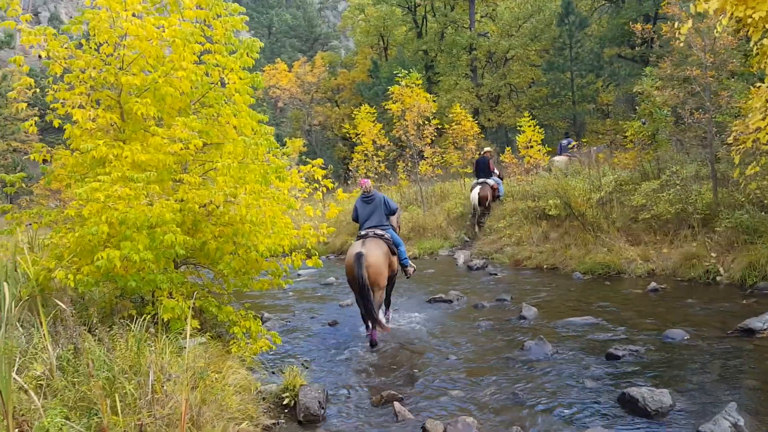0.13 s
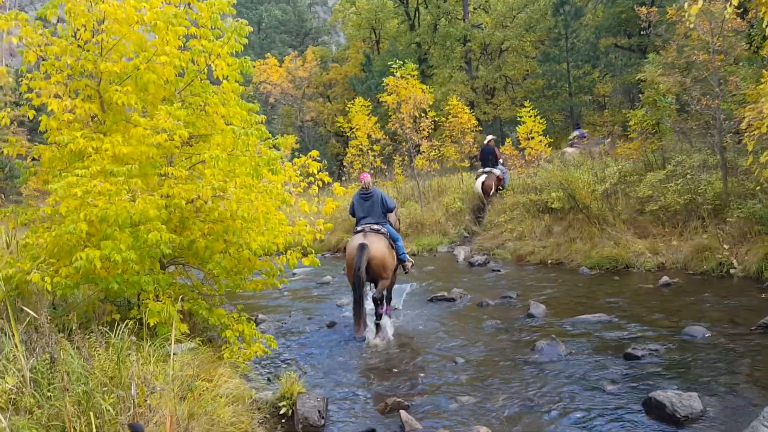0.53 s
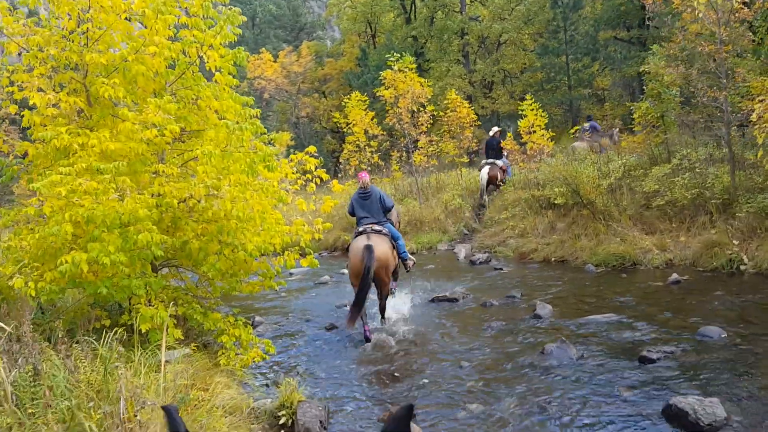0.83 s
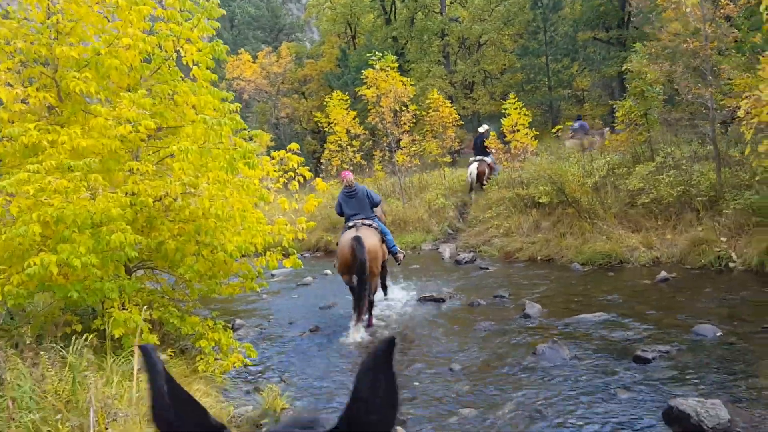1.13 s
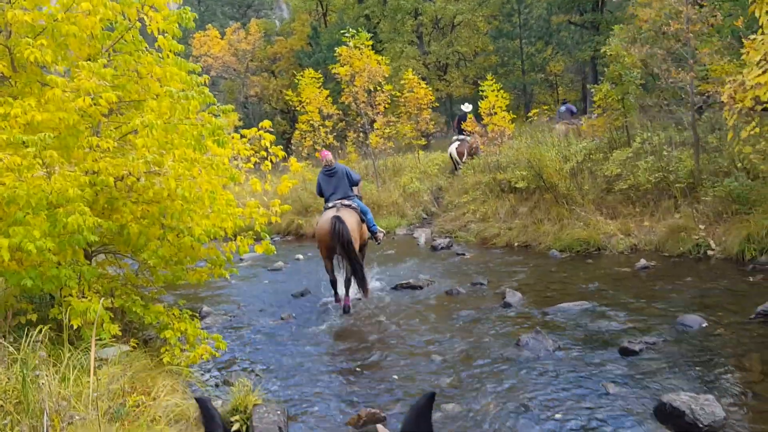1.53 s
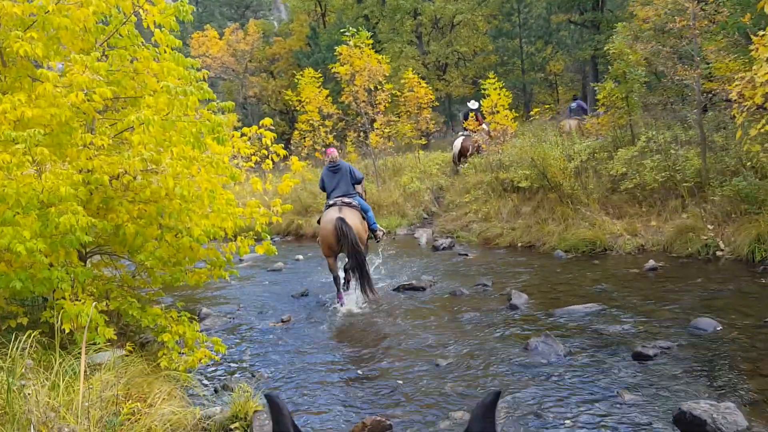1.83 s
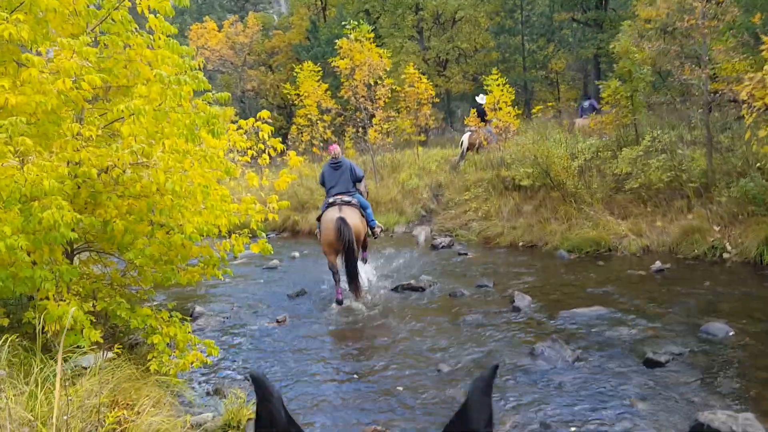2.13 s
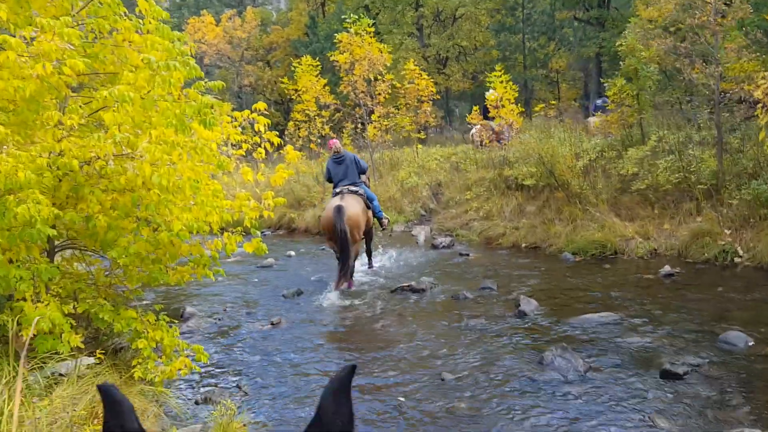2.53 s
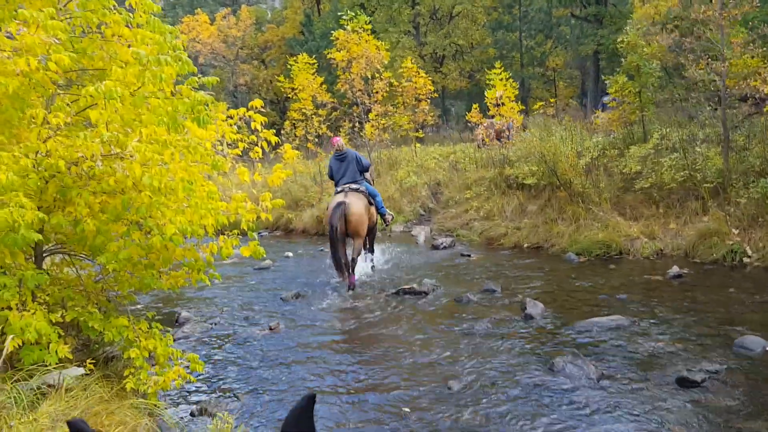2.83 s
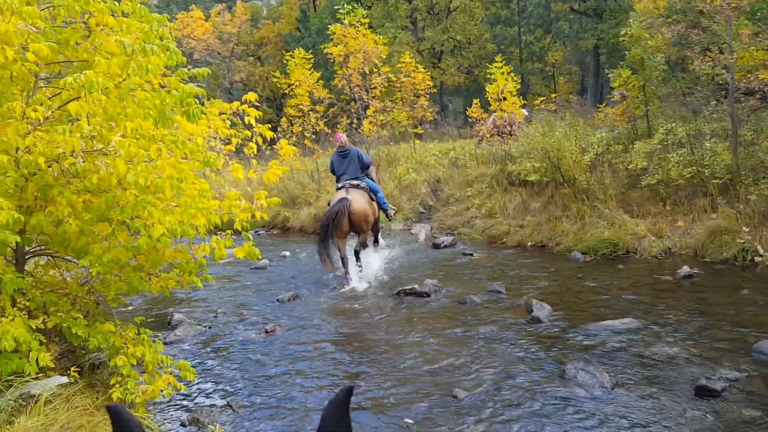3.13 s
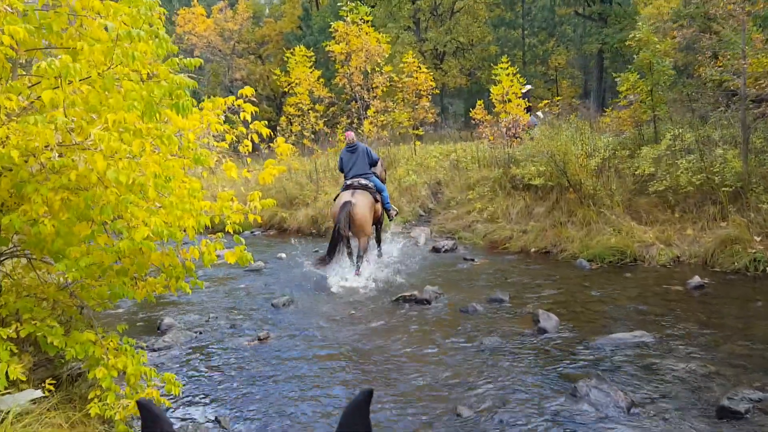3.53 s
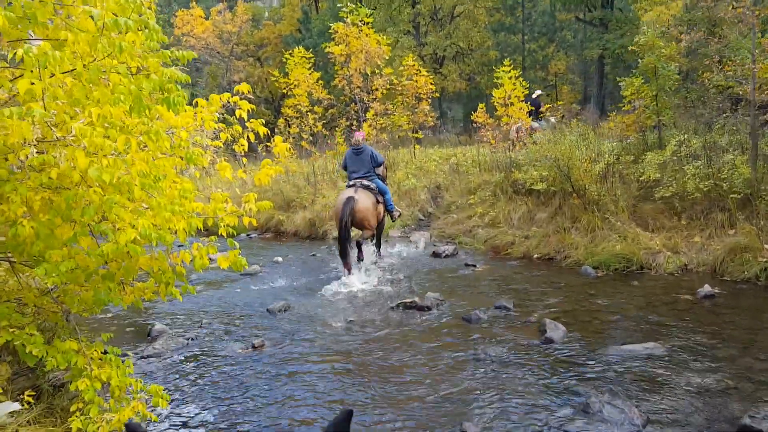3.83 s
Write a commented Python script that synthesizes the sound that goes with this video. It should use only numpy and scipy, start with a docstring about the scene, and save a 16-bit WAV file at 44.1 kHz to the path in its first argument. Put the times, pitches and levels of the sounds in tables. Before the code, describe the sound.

Horse legs splash irregularly through shallow water, with hollow plops and stony knocks over gurgling flow.

```python
"""A creek full of small bubbles washes along, then horses wade through it, heard from the saddle.
Legs dragged through the water swish and throw up spray: patchy noise mixed with tiny bubble rings.
Hooves slap (bursts of noise), knock on the stony bed (low tones that sink in pitch) and make
trapped air and loose stones plop (short ringing tones). The hits scatter briefly off stones and water."""
import sys
import numpy as np
from scipy import signal
from scipy.fft import rfft, irfft, next_fast_len
from scipy.io import wavfile
from scipy.ndimage import uniform_filter1d, map_coordinates

SR = 44100
rng = np.random.default_rng(int(sys.argv[2]) if len(sys.argv) > 2 else 0)


def int16_out(signal):
    """Quantize to a 16-bit WAV file."""
    q = np.round(np.clip(np.atleast_2d(signal).T, -1, 1) * 32767)
    wavfile.write(sys.argv[1], SR, q.astype(np.int16))


N = 176400  # samples: 4 s

# Legs dragged through the water: start_s, length_s, churn_db, spray_db
SWISH_STROKES = [(0.105, 0.035, -45, -38), (0.147, 0.08, -40.5, -53), (0.295, .06, -48.5, -73),
                 (0.433, 0.053, -44, -56), (0.525, 0.019, -39.5, -72), (0.58, 0.0077, -47, -45),
                 (0.755, 0.1, -38.5, -42), (0.849, 0.12, -38.5, -47), (1.07, 0.18, -42, -41),
                 (1.392, 0.046, -41.5, -43), (1.459, 0.15, -39.5, -77), (1.728, 0.099, -38, -44),
                 (1.853, 0.12, -45.5, -56.5), (2.061, 0.09, -38, -40), (2.168, 0.016, -36.5, -56),
                 (2.375, 0.14, -43, -43.5), (2.658, 0.065, -36.5, -43), (2.76, 0.12, -37.5, -60),
                 (2.971, 0.058, -45, -43), (3.034, 0.06, -37.5, -52), (3.125, 0.045, -37, -45),
                 (3.227, 0.099, -35, -39.5), (3.38, .04, -37, -43), (3.423, 0.12, -40.5, -46.5),
                 (3.647, 0.11, -41, -41.5), (3.765, 0.061, -45, -61), (3.867, 0.056, -47, -70),
                 (3.928, 0.1, -63, -42)]
# Tone colour of the stirred water: frequency_hz, level_db (per Hz)
CHURN_COLOUR = [(35, -55), (60, -23.5), (209, -3.5), (372, -8), (633, 1), (800, -6.5), (1110, -4),
                (1490, -8.5), (1800, -17), (2010, -9.5), (2500, -19), (3250, -48), (5500, -120)]
# Tone colour of the thrown spray: frequency_hz, level_db (per Hz)
SPRAY_COLOUR = [(1000, 12.5), (1700, 3.5), (2380, -6.5), (3240, -1.5), (4360, -5), (5060, -11.5),
                (6160, -9), (10200, -17), (12400, -10.5), (15800, -25)]
ATTACK_S, RELEASE_S = 0.0073, 0.022  # straight rise; time for the fall to shrink to 37 %
CHURN_FLUTTER_DB, SPRAY_FLUTTER_DB = 2.0, 2.4

# Air pockets and loose stones under the hooves: start_s, level_db, pitch_hz, t60_ms (time to fall 60 dB)
AIR_POCKETS = [(0.177, -27.5, 605, 12), (0.1985, -26, 1800, 10), (0.2, -27, 1080, 23),
               (0.1937, -15, 555, 9.4), (0.2058, -20, 480, 17), (0.299, -31.5, 440, 19),
               (0.438, -27, 1160, 12), (0.473, -26, 580, 10), (0.485, -25, 1033, 8),
               (0.5394, -23.5, 415, 10), (0.5415, -30, 1561, 15), (0.5822, -26, 960, 17),
               (0.589, -29, 990, 20), (0.8467, -16, 474, 51), (0.847, -21.5, 1110, 16),
               (0.8687, -13, 445, 10.6), (0.871, -29, 1590, 21), (0.904, -22.5, 274, 26),
               (0.9053, -12, 493, 8.7), (0.908, -22.5, 1120, 11), (0.914, -24, 524, 45),
               (1.122, -27, 694, 9.1), (1.1484, -28.5, 940, 17), (1.172, -31, 650, 7.6),
               (1.181, -27.5, 600, 9), (1.2248, -11.5, 488, 9.9), (1.2255, -24, 1100, 14),
               (1.3985, -30, 1530, 49), (1.4183, -28, 979, 10), (1.4194, -28, 1470, 9.9),
               (1.4549, -10, 476, 8.1), (1.4541, -9, 1137, 28), (1.4763, -20, 584, 46),
               (1.4768, -25, 990, 13), (1.5, -20, 570, 5.9), (1.7836, -28, 443, 40), (1.7943, -25, 478, 15),
               (1.878, -31, 350, 31), (1.883, -24, 370, 10), (1.9537, -21, 494, 21),
               (2.0751, -33, 667, 7.4), (2.0761, -21.5, 1140, 10), (2.1158, -24.5, 1510, 11),
               (2.1493, -23.5, 1180, 21), (2.1818, -17, 581, 12), (2.1982, -28, 207, 57),
               (2.2016, -25.5, 616, 17), (2.316, -33, 473, 25), (2.384, -28, 1140, 14),
               (2.4248, -30, 950, 12), (2.4559, -15.5, 540, 11), (2.4665, -23.5, 360, 14),
               (2.6903, -28, 1055, 30), (2.7634, -12, 514, 11), (2.7631, -19.5, 1450, 16),
               (2.7757, -12, 453, 15), (2.7804, -17, 1141, 9), (2.7897, -24, 420, 24),
               (2.814, -23, 1130, 11), (2.8146, -35, 273, 64), (2.8217, -31, 1010, 13),
               (2.885, -28, 1000, 14), (2.982, -22.5, 585, 13), (2.9881, -19.5, 230, 9.3),
               (2.9894, -28, 1060, 25), (2.9897, -19.5, 530, 12), (3.0683, -26.5, 320, 18),
               (3.136, -21.5, 360, 9.2), (3.153, -17, 600, 6.2), (3.1528, -21.5, 238, 20),
               (3.227, -2, 540, 8.9), (3.2288, -12.5, 1050, 19.6), (3.2468, -24.5, 510, 54),
               (3.2764, -17, 616, 15), (3.2799, -19, 1020, 14), (3.2899, -23.5, 1033, 33),
               (3.2905, -11, 570, 15), (3.3023, -14.5, 418, 42), (3.3377, -26, 478, 17),
               (3.3447, -24.5, 605, 18), (3.344, -27.5, 177, 18), (3.3866, -27.5, 717, 31),
               (3.3908, -14.5, 1910, 6.8), (3.3977, -26, 340, 14), (3.4045, -24, 1470, 10),
               (3.4102, -32, 960, 9.2), (3.4467, -30, 217, 44), (3.4565, -19, 1120, 12),
               (3.4566, -23, 2830, 6), (3.4835, -15, 492, 7.5), (3.4915, -25, 209, 38),
               (3.5065, -26, 573, 13), (3.5308, -31, 1447, 36), (3.5352, -26, 211, 10),
               (3.5394, -26.5, 1040, 26), (3.6524, -10.5, 430, 9.4), (3.6543, -10, 1080, 6),
               (3.665, -25, 1007, 39), (3.6654, -15.5, 370, 15), (3.688, -10, 494, 6),
               (3.7102, -20.5, 221, 21), (3.7374, -27, 506, 14), (3.7774, -24, 545, 40),
               (3.7828, -29, 242, 29), (3.8826, -22, 290, 11), (3.8966, -23, 567, 20),
               (3.9541, -26, 310, 14), (3.9844, -23, 380, 52), (3.9955, -26, 1496, 12)]
RISE_CYCLES, PLOP_ROUGH, ROUNDING = 1, 0.1, 1.25  # rise in cycles, raggedness share, decay exponent

# Hooves and thrown water slapping down: start_s, level_db, treble_share_db, t60_ms
WATER_SLAPS = [(0.193, -20.5, -34, 12), (0.582, -27, -2.5, 15), (0.587, -24.5, -9, 16.5),
               (0.692, -34.5, -4, 22), (0.802, -23, -15, 12), (0.8463, -24, -26, 9.7),
               (0.8692, -26, -22, 14), (1.159, -39, 1, 14), (1.4543, -18.5, -26, 18.7),
               (1.5442, -29.5, -14, 18), (1.805, -31.5, -30, 30), (2.0763, -15.5, -32, 12.2),
               (2.7634, -25, -19.5, 11), (2.781, -26, -28, 17), (3.009, -26, -28, 16),
               (3.2277, -5.5, -20.5, 13.3), (3.391, -20, -6, 9.1), (3.3963, -15.5, -10, 9.4),
               (3.4555, -21, -18, 16), (3.4764, -23, -1, 9), (3.558, -36, 2, 14), (3.652, -11, -23, 9.5),
               (3.6673, -22, -19, 14), (3.8216, -33, 1, 14), (3.97, -27, -16, 12)]
# Tone colour of a slap's hard body: frequency_hz, level_db
SLAP_BODY_COLOUR = [(700, -26), (1500, 11), (2600, 4.5), (4300, -7), (5200, -22), (9000, -70)]
# Tone colour of a slap's wet treble: frequency_hz, level_db
SLAP_TREBLE_COLOUR = [(3000, -24), (5000, 7), (12000, -2), (16000, -12)]
SLAP_RISE_S = 0.00098

# Hooves landing on the stony bed: start_s, level_db, starting_pitch_hz
HOOF_THUDS = [(0.585, -36, 175), (0.847, -24.5, 204), (1.0907, -20.5, 236), (1.453, -23, 162),
              (1.545, -30.5, 131), (1.645, -37, 200), (1.817, -34, 260), (1.949, -44, 156),
              (2.189, -30, 200), (2.456, -22.5, 189), (2.777, -29, 181), (2.984, -43, 195),
              (3.087, -35, 159), (3.148, -24, 198), (3.224, -22, 172), (3.291, -29, 131),
              (3.476, -27.5, 200), (3.534, -41, 182), (3.652, -19.5, 198), (3.687, -21, 202)]
THUD_T60_S, THUD_RISE_S = 0.075, 0.0014
THUD_SAG, SAG_S = 0.48, 0.014  # share of pitch finally lost; time constant of the sinking

# Scatter off stones and water: frequency_hz, t60_s
SCATTER_DECAY = [(150, 0.053), (1000, 0.093), (6000, 0.071)]
SCATTER_DB, LOW_CUT_HZ = -9, 62

# Tone colour of the creek: frequency_hz, level_db (per Hz)
WASH_COLOUR = [(18, -30), (30, -18), (48, -14.5), (156, -0.5), (335, -4.5), (471, 1), (795, -5.5),
               (1120, -1), (1310, -8.5), (1570, -2), (2210, -10.5), (4260, -15), (4980, -21.5),
               (6150, -20.5), (12800, -27.5), (15800, -31)]
# Creek level over time: time_s, body_db, hiss_db
CREEK_LEVEL = [(0.0, -42, -50), (0.2, -42.5, -51), (0.29, -43, -56), (0.37, -43, -49.5), (2.07, -43, -50),
               (3.18, -41.5, -48.5), (3.26, -39, -44.5), (4.0, -37.5, -44)]
SPLIT_HZ = 2630  # crossover between body and hiss
BODY_FLUTTER_DB, BODY_FLUTTER_PER_S = 2.4, 15
HISS_FLUTTER_DB, HISS_FLUTTER_PER_S = 1.2, 40

# How alike left and right are: frequency_hz, likeness (1 = identical)
LIKENESS = [(40, .55), (90, 1), (290, 0.98), (640, 0.91), (1410, 0.83), (3100, 0.51), (6820, 0.28),
            (15000, 0.19)]
# Left port's level over the right: frequency_hz, difference_db
PORT_LEVEL = [(60, 1.5), (110, 0), (200, 1.5), (380, 0), (700, 0.5), (1290, -3.5), (2380, 0.5), (4400, -3),
              (8120, 0.5), (15000, 1.5)]
# Left port's phase ahead of the right, faded out below the second row: frequency_hz, lead_radians
PORT_PHASE = [(0, -5.5), (1210, 0.74), (1720, 1.68), (3790, 0.0), (4570, 0.65), (5860, 7), (9040, 8),
              (14100, 8.5), (16400, 8)]
TOP_HZ = 15800


def amp(db):
    """Turn decibels into a gain."""
    return 10 ** (np.asarray(db) / 20)


def unit(x):
    """Scale a signal to an rms of 1."""
    return x / np.sqrt(np.mean(x ** 2) + 1e-20)


def along(points, hz):
    """Read a table of (frequency, value) points along a log frequency axis."""
    frequency, value = np.transpose(points)
    return np.interp(np.log(hz + 1), np.log(frequency + 1), value)


def wobble(rate):
    """A smooth random curve with this many random points a second."""
    knots = rng.standard_normal(int(N * rate / SR) + 4)
    return map_coordinates(knots, [np.arange(N) * rate / SR])


def filtered(x, response):
    """Multiply the spectrum of x by a response that depends on frequency."""
    size = next_fast_len(N + 8192)
    spectrum = rfft(x, size) * response(np.fft.rfftfreq(size, 1 / SR))
    return irfft(spectrum, size)[..., :N]


def spread(pair, wide):
    """Mix two signals into left and right; a larger turn makes the two sides less alike."""
    def mix(hz):
        turn = np.clip(wide, 0, 1.5) * np.arccos(np.clip(along(LIKENESS, hz), -1, 1)) / 2
        return np.array([np.cos(turn), np.sin(turn)])

    mid, side = filtered(pair, mix)
    return np.array([mid + side, mid - side])


def bubbles(bubble_hz, cycles, scatter_db, count):
    """Many tiny rings at random times, with scattered pitch and size, as a pair of signals."""
    start = rng.integers(0, N, (count, 1))
    t = np.arange(700) / SR
    hz = np.clip(bubble_hz * np.exp(0.765 * rng.standard_normal((count, 1))), 100, 15000)
    turns = hz * t
    shape = turns * np.exp(-turns / cycles) * np.sin(2 * np.pi * turns) * np.sqrt(hz)
    shape = shape * amp(scatter_db * np.minimum(rng.exponential(size=(count, 1)), 3))
    index = (start + np.arange(len(t))).ravel()

    def one_side():
        strength = rng.standard_normal((count, 1))
        return np.bincount(index, (shape * strength).ravel())[:N]

    return np.array([one_side(), one_side()])


def water(spectrum, bubble_hz, cycles, grain_db, scatter_db, patchy_db, count):
    """Patchy noise plus small bubbles, both given one tone colour, at an rms of 1."""
    z = signal.stft(rng.standard_normal((2, N)), nperseg=512)[2]
    # Smooth random patches over frequency and time raise and lower the noise.
    patches = uniform_filter1d(rng.standard_normal(z.shape[1:]), size=5, axis=0)
    patches = uniform_filter1d(patches, size=6, axis=1)
    noise = signal.istft(z * amp(patchy_db * unit(patches)), nperseg=512)[1][:, :N]
    drops = bubbles(bubble_hz, cycles, scatter_db, count)
    colour = lambda hz: amp(along(spectrum, hz))
    return unit(unit(filtered(noise, colour)) + amp(grain_db) * unit(filtered(drops, colour)))


def swishes():
    """Each stroke stirs a lumpy churn with small bubbles and throws up finer spray."""
    t, churn, spray = np.arange(N) / SR, np.zeros(N), np.zeros(N)
    for start, length, churn_db, spray_db in SWISH_STROKES:
        rise = np.clip((t - start) / ATTACK_S, 0, 1)
        shape = rise * np.exp(-np.maximum(t - start - length, 0) / RELEASE_S)
        churn += shape * amp(churn_db)
        spray += shape * amp(spray_db)
    # The extra colour points cut the churn's treble and the spray's bass.
    low = water(CHURN_COLOUR + [(3500, -60)], bubble_hz=893, cycles=1.15, grain_db=1,
                scatter_db=2.5, patchy_db=3.5, count=2500)
    low = low * amp(CHURN_FLUTTER_DB * wobble(40.1))
    high = water([(1200, -50)] + SPRAY_COLOUR, bubble_hz=5350, cycles=0.49, grain_db=-3.5,
                 scatter_db=4.0, patchy_db=-1.0, count=2000)
    high = high * amp(SPRAY_FLUTTER_DB * wobble(50))
    return spread(churn * low, wide=0.77) + spread(spray * high, wide=1.0)


def ring(hz, t60, t):
    """A pocket of air rings like a small bell, with a soft start and a rounded decay."""
    rise = RISE_CYCLES / hz
    fall = amp(-60 * (np.maximum(t - rise, 0) / t60) ** ROUNDING)
    shape = np.sin(np.pi / 2 * np.minimum(t / rise, 1)) ** 2 * fall
    return shape * np.sin(2 * np.pi * hz * t)


def plops():
    """Air pockets and loose stones ring briefly, with a slightly ragged level."""
    out, t = np.zeros(N + SR), np.arange(SR // 8) / SR
    ragged = 1 + PLOP_ROUGH * wobble(350)
    for start, db, hz, ms in AIR_POCKETS:
        out[round(start * SR):][:len(t)] += amp(db) * ring(hz, ms / 1000, t)
    return out[:N] * ragged


def slaps():
    """Hooves and thrown water hit the surface: sharp noise with a hard body and a wet treble."""
    t = np.arange(SR // 10) / SR
    body, treble = np.zeros((2, N + SR))
    for start, db, treble_db, ms in WATER_SLAPS:
        shape = amp(db - 60 * t / (ms / 1000)) * (1 - np.exp(-t / SLAP_RISE_S))
        first = round(start * SR)
        body[first:][:len(t)] += shape
        treble[first:][:len(t)] += shape * amp(treble_db)

    def noise(points):
        return unit(filtered(rng.standard_normal(N), lambda hz: amp(along(points, hz))))

    return body[:N] * noise(SLAP_BODY_COLOUR) + treble[:N] * noise(SLAP_TREBLE_COLOUR)


def thuds():
    """Hooves on the stony bed give dull low knocks whose pitch sinks."""
    out, t = np.zeros(N + SR), np.arange(SR // 6) / SR
    # Time that runs ever slower makes the tone sink.
    slowing = t * (1 - THUD_SAG) + THUD_SAG * SAG_S * (1 - np.exp(-t / SAG_S))
    for start, db, hz in HOOF_THUDS:
        shape = amp(db - 60 * t / THUD_T60_S) * (1 - np.exp(-t / THUD_RISE_S))
        out[round(start * SR):][:len(t)] += shape * np.sin(2 * np.pi * hz * slowing)
    return out[:N]


def banks(x):
    """Stones and water scatter the hits into a short noisy tail; each frequency dies at its own speed."""
    hz, t, z = signal.stft(rng.standard_normal((2, SR // 4)), SR, nperseg=128)
    fall = amp(-60 * t / along(SCATTER_DECAY, hz)[:, None])
    tail = signal.istft(z * fall, SR, nperseg=128)[1]
    late = np.pad(x, (130, 0))  # the scatter starts 130 samples (3 ms) late
    return signal.fftconvolve(late[None], tail / np.linalg.norm(tail[0]), axes=1)[:, :N]


def creek():
    """The steady wash of bubbly water: a gurgling body and a finer hiss, each fluttering in level."""
    time_s, body_db, hiss_db = np.transpose(CREEK_LEVEL)
    t = np.arange(N) / SR
    wash = water(WASH_COLOUR, bubble_hz=1004, cycles=1.28, grain_db=-1.5,
                 scatter_db=3.0, patchy_db=1.68, count=2500)
    low_share = lambda hz: 1 / (1 + (hz / SPLIT_HZ) ** 4)
    body_level = np.interp(t, time_s, body_db) + BODY_FLUTTER_DB * wobble(BODY_FLUTTER_PER_S)
    body = unit(filtered(wash, low_share)) * amp(body_level)
    hiss_level = np.interp(t, time_s, hiss_db) + HISS_FLUTTER_DB * wobble(HISS_FLUTTER_PER_S)
    hiss = unit(filtered(wash, lambda hz: 1 - low_share(hz))) * amp(hiss_level)
    return spread(body + hiss, wide=1.0)


def scene():
    """Hits in the middle, without deep bass, with their scatter, over swishes and creek."""
    low_cut = lambda hz: (1j * hz / (LOW_CUT_HZ + 1j * hz)) ** 2
    hits = filtered(plops() + slaps() + thuds(), low_cut)
    scatter = amp(SCATTER_DB) * spread(banks(hits), wide=1.0)
    return hits + scatter + swishes() + creek()


def record(dry):
    """Two microphone ports differ in level and phase by frequency; nothing passes above TOP_HZ."""
    half = np.array([[0.5], [-0.5]])  # each port takes half the difference

    def ports(hz):
        level = amp(along(PORT_LEVEL, hz) * half)
        fade = np.minimum(hz / PORT_PHASE[1][0], 1)
        phase = np.exp(1j * along(PORT_PHASE, hz) * fade * half)
        return level * phase * (hz < TOP_HZ)

    return filtered(dry, ports)


dry = scene()
out = record(dry)
int16_out(out)
```